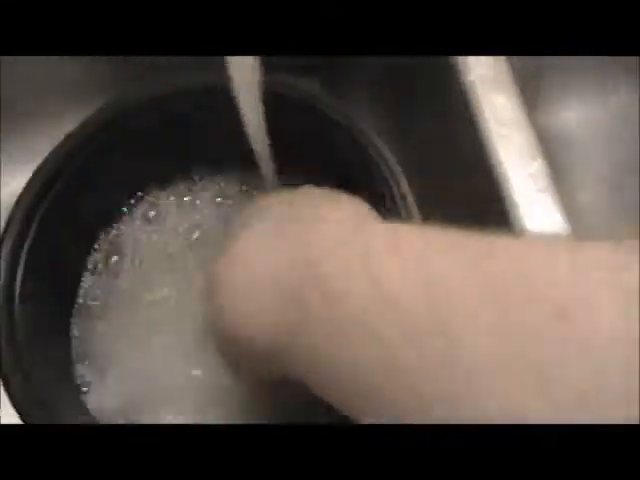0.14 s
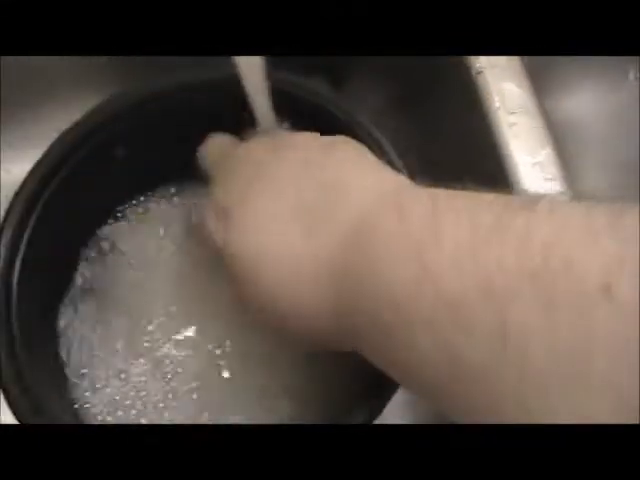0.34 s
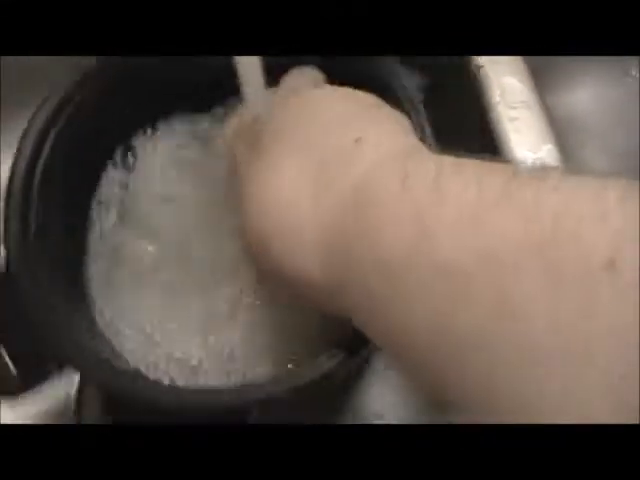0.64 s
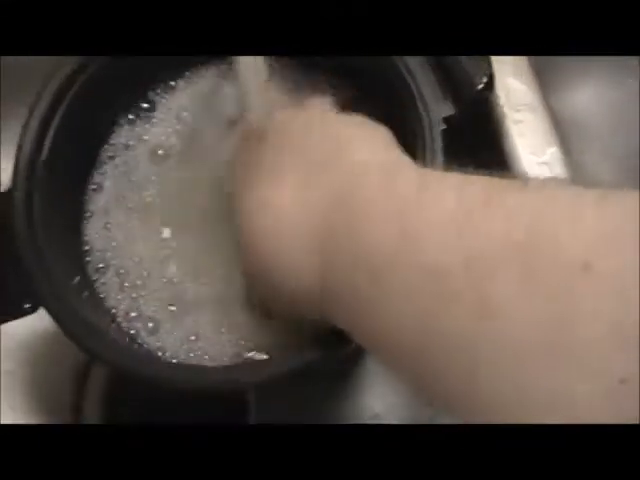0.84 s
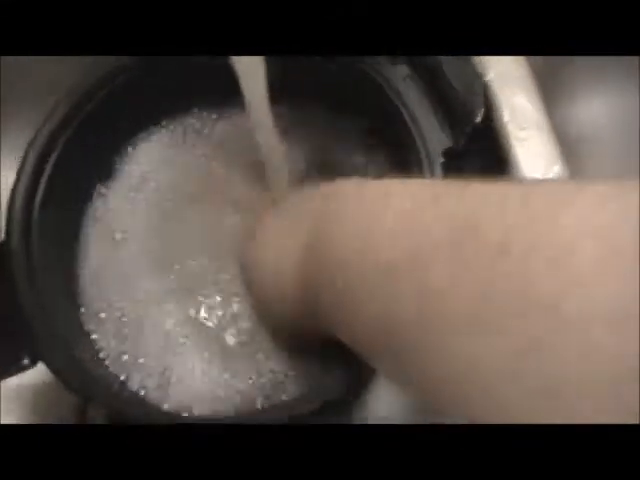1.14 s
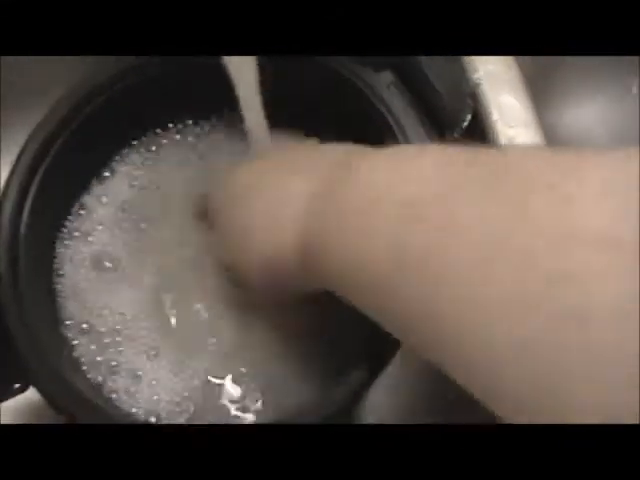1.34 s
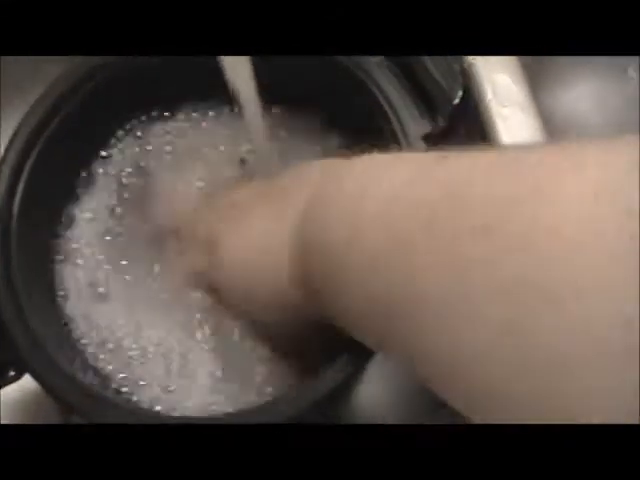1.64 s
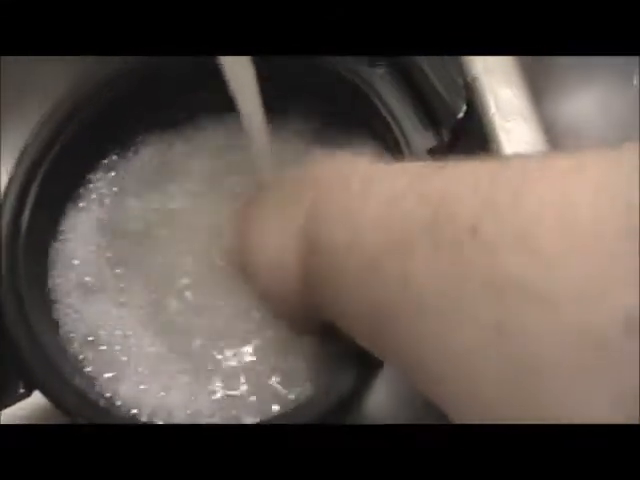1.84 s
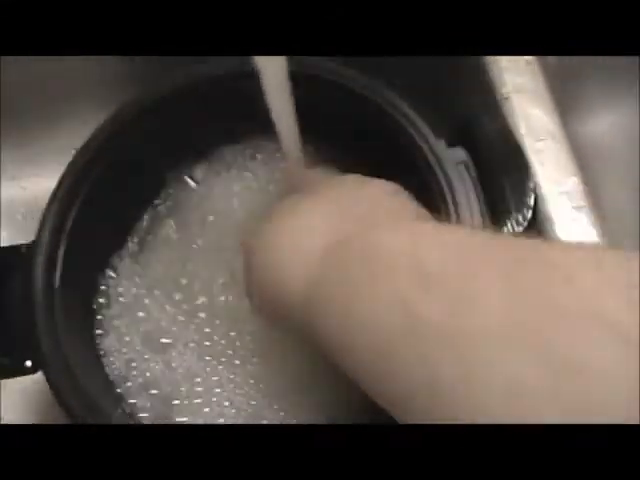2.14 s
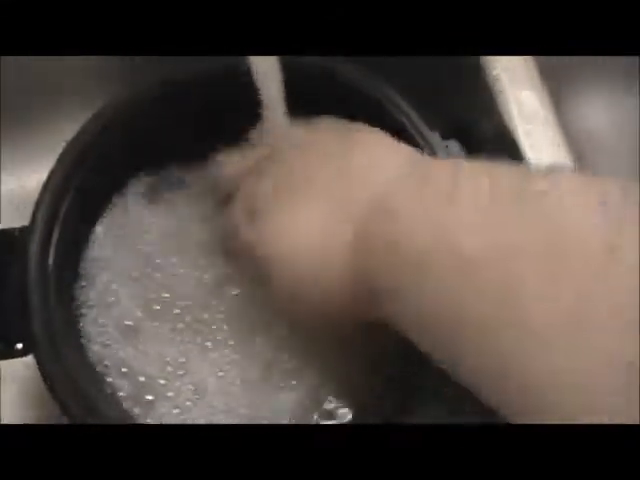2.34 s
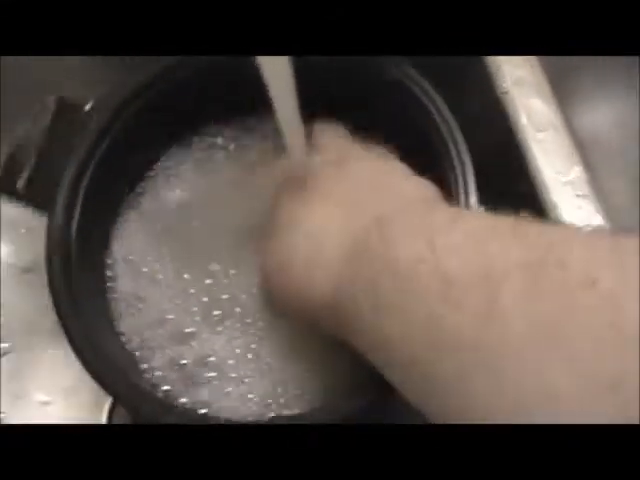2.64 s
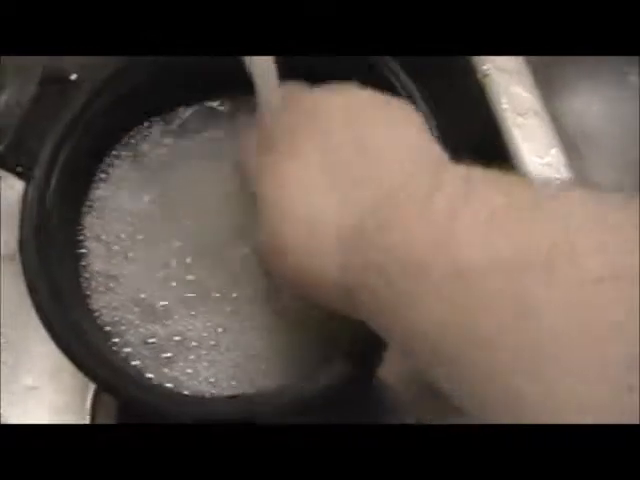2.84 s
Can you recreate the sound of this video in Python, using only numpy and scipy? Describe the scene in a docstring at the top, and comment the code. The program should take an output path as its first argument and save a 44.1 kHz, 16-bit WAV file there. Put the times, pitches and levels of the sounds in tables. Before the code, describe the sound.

Steady faucet stream hissing into a pot in a sink, with watery slops, bubbles and soft thumps

```python
"""A kitchen tap runs steadily into a pot of rice in a steel sink, heard from close above.
The jet is droplets and mist: it fizzes on the back of a hand, falls mostly into open water for about
a second, and meets the hand again. The stirring hand churns and slops the water, made of random impacts
and noise bursts that ring the pot's modes, with bubbles and sung notes among them.
The sink floor booms in soft thumps, the basin drones, and a few wet clinks ring out."""
import sys
import numpy as np
from scipy import signal
from scipy.fft import rfft, irfft
from scipy.io import wavfile
from scipy.ndimage import map_coordinates

SR = 44100
rng = np.random.default_rng(int(sys.argv[2]) if len(sys.argv) > 2 else 0)


def waveform_to_disk(signal):
    """Save audio, clipped to [-1, 1], as 16-bit WAV at the path in sys.argv[1]."""
    frames = np.transpose(np.atleast_2d(signal))
    scaled = np.clip(frames, -1, 1) * 32767
    samples = np.round(scaled).astype(np.int16)
    wavfile.write(sys.argv[1], SR, samples)


N = 132300
TIME, FREQ = np.arange(N) / SR, np.fft.rfftfreq(N, 1 / SR)


def amp(db):
    """Decibels to gain."""
    return 10 ** (np.asarray(db) / 20)


def unit(x):
    """Scales to rms 1."""
    return x / np.sqrt(np.mean(x ** 2) + 1e-20)


def over_time(points):
    """A control curve at every sample."""
    return np.interp(TIME, *np.transpose(points))


def over_freq(points):
    """A spectrum at every frequency, joined on a log axis."""
    freq_hz, value = np.transpose(points)
    return np.interp(np.log(FREQ + 1), np.log(freq_hz + 1), value)


def colour(x, points):
    """Filters by a spectrum in dB."""
    return irfft(rfft(x) * amp(over_freq(points)), N)


def add(mix, start_s, sound):
    """Mixes a sound in at a time."""
    part = mix[max(round(start_s * SR), 0):][:len(sound)]
    part += sound[:len(part)]


def impacts(per_s, spread_db):
    """Random clicks of either sign, many small and a few large."""
    size = amp(spread_db * np.minimum(rng.exponential(1, N), 5.5))
    sign = rng.choice([-1, 1], N)
    return size * sign * (rng.random(N) < per_s / SR)


def wander(per_s):
    """Smooth random drift of rms 1."""
    smoothing = np.exp(-(FREQ / per_s) ** 2)
    return unit(irfft(rfft(rng.standard_normal(N)) * smoothing, N))


def ring(x, modes):
    """The direct sound plus the ringing of some modes, each a damped complex resonator."""
    out = x.copy()
    for hz, peak_db, t60_s in modes:
        decay = np.exp(-np.log(1000) / (t60_s * SR))
        pole = decay * np.exp(2j * np.pi * hz / SR)
        out += 2 * amp(peak_db) * signal.lfilter([1 - decay], [1, -pole], x).real
    return out


# droplet pings per second, their spread in dB, and cycles each rings before falling to 1/e
DROPS_PER_S, DROP_SPREAD_DB, DROP_CYCLES = 6000, 3.5, 4.3
SPLAT_GAIN = .55  # sharp splats against the ringing droplets


def droplets(count=28):
    """Tiny bubbles of many sizes, each ringing for a few cycles, among sharp splats."""
    t, out = np.arange(256) / SR, np.zeros(N)
    for hz in np.linspace(1800, 16000, count):
        ping = np.sin(2 * np.pi * hz * t) * np.exp(-t * hz / DROP_CYCLES)
        hits = impacts(DROPS_PER_S / count, DROP_SPREAD_DB)
        out += np.convolve(hits, unit(ping))[:N]
    splats = impacts(per_s=5000, spread_db=2.6)
    return unit(out) + SPLAT_GAIN * unit(splats)


# echoes from the pot wall and the arm: [shortest_s, longest_s]
ECHO_DELAY_S = (.001, .012)
ECHO_GAIN, ECHO_DRIFT_S = .15, .00006  # gain of each, rms drift of its delay


def near_walls(x, count=8):
    """Echoes from the pot wall and the arm, whose delays drift as the hand moves."""
    out = x.copy()
    for delay_s in rng.uniform(*ECHO_DELAY_S, count):
        read_s = TIME - delay_s - ECHO_DRIFT_S * wander(per_s=1.29)
        out += ECHO_GAIN * rng.choice([-1, 1]) * map_coordinates(x, [read_s * SR], order=3)
    return out


# spray colour on the hand and in open water: [freq_hz, level_db per Hz]
ON_HAND = [(1120, -39), (1900, -3.5), (2000, -11), (2110, -11.5), (2250, -9), (2430, -7.5), (2800, -4),
           (3320, -17.5), (3430, -2), (3920, 1), (4210, 0), (4850, 2.5), (5730, -4), (6960, 1.5),
           (8380, -2), (10000, 1), (10500, -4), (12300, -3.5), (14100, -9.5), (15200, -9), (15700, -5.5)]
IN_WATER = [(1120, -30), (1900, -14), (2090, -12), (2330, -10), (2630, -7), (2800, -7), (3090, -14),
            (3170, -9), (3690, -6), (4360, -3.5), (4720, -3), (5390, 1), (6380, -1), (7280, -5.5),
            (8240, -1.5), (9000, 2.5), (10100, -8.5), (11300, -3), (12400, -9), (13800, -8.5), (15700, -18)]
# narrow resonances between hand, water and pot wall: [freq_hz, peak_db over the direct sound, t60_s]
HAND_RING = [(3350, -18, .03), (4100, -15, 0.01), (4460, -14, 0.011), (5030, -28, 0.065), (5950, 8, 0.025),
             (6920, -1, 0.036), (7640, 0, 0.047), (10100, -3.5, 0.031)]
WATER_RING = [(3505, -9, .03), (4430, -8, .03), (5540, -7, .02), (6250, -7, .015), (7920, -8, .02),
              (8400, -4, .012), (9100, -4, .015), (11050, -8, .015)]
# where the jet lands: [time_s, open_water_share 0-1]
LANDING = [(0, 0.17), (.85, .05), (1.12, 0.8), (1.42, 0.6), (1.52, 0.44), (1.65, 0.7), (1.95, 0.56),
           (2.2, 0.26), (3, 0.1)]
# strength of the spray: [time_s, level_db]
SPRAY = [(0.3, -18.5), (0.69, -19), (1.31, -17.5), (1.6, -18.5), (1.64, -17), (2.88, -18.5), (2.95, -19)]
MIST_DB = 6.5  # over the ringing droplets


def jet(flutter_db=0.55, flutter_per_s=50):
    """Droplets and fine mist; their colour follows what the jet lands on."""
    mist = amp(MIST_DB) * rng.standard_normal(N)
    spray = near_walls(droplets() + mist)
    spray = spray * amp(flutter_db * wander(flutter_per_s))
    wet = np.clip(over_time(LANDING), 0, 1)
    hand = unit(ring(colour(spray, ON_HAND), HAND_RING))
    water = unit(ring(colour(spray, IN_WATER), WATER_RING))
    return unit((1 - wet) * hand + wet * water) * amp(over_time(SPRAY))


SWAY_PER_S, SWAY_S = 3, .0009  # rate of the sway, rms depth as a wandering delay


def swayed(x):
    """The pitch wavers as the water sloshes from side to side."""
    read_s = TIME + SWAY_S * wander(SWAY_PER_S)
    return map_coordinates(x, [read_s * SR], order=3, mode="mirror")


# ringing of the pot and the sink around it: [freq_hz, peak_db over the direct sound, t60_s]
POT = [(343, 6.5, 0.038), (447, 3.5, 0.067), (586, 5, 0.22), (731.5, 13, 0.047), (860, 5.5, 0.029),
       (1021, -1, 0.023), (1438, 11, 0.038), (1501, 12, 0.047), (1760, 14, 0.11), (2887, 4.5, .03)]
# colour of the churning, and of the jet drumming in the pot: [freq_hz, level_db per Hz]
CHURN_COLOUR = [(60, -42), (190, -1.5), (320, -2), (550, 3.5), (900, 2.5), (1300, 5.5), (2000, -18),
                (3500, -6)]
DRUM_COLOUR = [(60, -37), (200, -10), (300, -8.5), (500, 0), (800, -4), (1200, -4.5), (1600, 6.5),
               (2300, -3.5), (3200, 17), (5000, -10)]
# churning of the water: [time_s, level_db before the CHURN_DB trim]
CHURN = [(0.0, -28.5), (0.13, -33), (0.26, -36), (0.51, -33), (0.8, -35.5), (1.07, -33), (1.17, -32.5),
         (1.51, -31.5), (1.75, -28.5), (2.13, -29.5), (2.56, -39.5), (2.77, -36.5), (3.0, -35.5)]
CHURN_DB, CHURN_PER_S, CHURN_SPREAD_DB = -1, 900, 1.5
DRUM_DB = -31.5


def churn():
    """The jet drums evenly in the pot while the hand stirs water and rice, now harder, now softer."""
    drum_hits = impacts(per_s=2000, spread_db=2.5)
    drum = unit(ring(colour(drum_hits, DRUM_COLOUR), POT))
    stir_hits = impacts(CHURN_PER_S, CHURN_SPREAD_DB)
    stir = unit(ring(colour(stir_hits, CHURN_COLOUR), POT))
    stir_gain = amp(CHURN_DB + over_time(CHURN))
    return amp(DRUM_DB) * swayed(drum) + stir_gain * swayed(stir)


BUBBLE_DB, BUBBLES_PER_S, BUBBLE_SPREAD_DB = -42, 130, 2.4
BUBBLE_T60_S, BUBBLE_GLIDE_PER_S = .07, 1.2  # ring time, fraction the pitch rises per second


def bubbles(count=30):
    """Small bubbles stirred up by the hand ring briefly, each rising a little in pitch."""
    t, out = np.arange(SR // 10) / SR, np.zeros(N)
    for hz in np.linspace(560, 2400, count):
        cycles = hz * t * (1 + BUBBLE_GLIDE_PER_S * t / 2)
        ping = np.sin(2 * np.pi * cycles) * amp(-60 * t / BUBBLE_T60_S)
        hits = impacts(BUBBLES_PER_S / count, BUBBLE_SPREAD_DB)
        out += signal.oaconvolve(hits, ping)[:N]
    return amp(BUBBLE_DB) * unit(ring(out, POT))


# low drone of the basin under the jet: [freq_hz, level_db per Hz]
BASIN = [(20, -48), (45, -31), (70, -13), (98, -2.5), (120, 0.5), (145, -3.5), (175, -26), (210, -15),
         (250, 0), (290, -28), (600, -54)]
BASIN_DB = -50.5


def basin():
    """Steady noise shaped into the basin's low drone."""
    return amp(BASIN_DB) * unit(colour(rng.standard_normal(N), BASIN))


# the water-loaded pot sings briefly: [start_s, length_s, peak_db, pitch_hz]
NOTES = [(0, .17, -29.5, 720), (.258, .048, -25, 646), (1.06, .05, -30, 760), (1.695, .08, -30, 1503),
         (1.71, .05, -31, 581), (1.67, .09, -32, 315), (2.365, .06, -35.5, 590), (2.49, .13, -36, 574),
         (2.93, .08, -34, 730)]
NOTE_RISE_S, NOTE_FADE_DB, NOTE_WAVER = .006, 9, .35  # attack, fade reached at length_s, waver gain


def note(length_s, peak_db, hz):
    """One mode of the pot rings out, wavering as the water moves."""
    rise = np.minimum(TIME / NOTE_RISE_S, 1)
    fade = amp(-NOTE_FADE_DB * np.minimum(TIME / length_s, 4) ** 2)
    phase = 2 * np.pi * hz * TIME
    tone = np.sin(phase) + NOTE_WAVER * wander(per_s=30) * np.cos(phase)
    return amp(peak_db) * rise * fade * tone


# slops of water against the pot: [start_s, length_s, level_db, centre_hz, width_octaves]
SLOPS = [(.005, 0.014, -29, 696, 0.61), (.113, 0.061, -28, 725, 1.06), (0.195, 0.041, -32.5, 735, 0.98),
         (0.225, 0.028, -22.5, 1440, 0.49), (.252, 0.0084, -21, 1450, 0.24),
         (0.258, .022, -20.5, 1254, .33), (.254, 0.021, -34, 470, 0.37), (0.467, 0.012, -25.5, 800, 1.23),
         (0.525, 0.023, -27.5, 560, 2.1), (0.716, 0.088, -36, 2100, 0.068), (0.773, 0.032, -29.5, 450, 3.3),
         (1.043, 0.053, -33.5, 804, 0.25), (1.173, 0.064, -32.5, 810, 0.17), (1.212, .025, -29.5, 460, 1.2),
         (1.341, 0.028, -27.5, 1130, 0.27), (1.565, 0.0087, -26, 654, 1.7), (1.613, .008, -21.5, 795, .5),
         (1.628, 0.016, -25.5, 660, 0.81), (1.653, .012, -19, 1140, 0.36), (1.666, .018, -20.5, 480, .65),
         (1.7, 0.013, -23, 686, 0.52), (1.765, 0.0096, -20.5, 810, 0.28), (1.825, .011, -21, 350, .45),
         (1.833, 0.015, -21.5, 900, 0.29), (1.96, 0.009, -25.5, 794, 0.55), (2.087, 0.009, -25, 810, 0.78),
         (2.11, 0.04, -29.5, 1890, 0.19), (2.285, 0.017, -30, 760, 0.16), (2.466, 0.0056, -26, 1430, 0.69),
         (2.52, 0.046, -34.5, 690, 0.76), (2.746, 0.022, -31.5, 1680, 0.36), (2.765, 0.075, -34, 820, 0.43)]
SLOP_RISE_S, SLOP_FADE_DB = .0012, 10  # attack, fade reached at length_s


def slop(length_s, level_db, centre_hz, width_octaves, size=8192):
    """A pocket of air collapses in a short burst of pops that ring the pot."""
    t, f = np.arange(size) / SR, np.fft.rfftfreq(size, 1 / SR)
    pops = rng.standard_normal(size) ** 3  # cubing makes the peaks spiky
    band_gain = np.exp(-.5 * (np.log2((f + 1) / centre_hz) / width_octaves) ** 2)
    band = irfft(rfft(pops) * band_gain, size)
    burst = band * np.minimum(t / SLOP_RISE_S, 1) * amp(-SLOP_FADE_DB * (t / length_s) ** 2)
    # the energy is that of level_db held for length_s
    return amp(level_db) * unit(ring(burst, POT)) * np.sqrt(length_s * SR / size)


# the pot nudges the sink: [start_s, level_db, pitch_hz]
THUMPS = [(0.022, -39, 109), (0.256, -44, 112), (0.526, -37, 105), (.776, -34, 106), (.893, -31, 100),
          (1.061, -45, 89), (1.212, -32.5, 121), (1.447, -30, 112.6), (1.608, -33, 122), (1.669, -31, 114),
          (1.708, -34, 111), (1.831, -37, 97), (1.877, -37, 116), (1.957, -42, 110), (2.02, -37, 105),
          (2.884, -41, 128)]
THUMP_RISE_S, THUMP_T60_S, THUMP_PUSH = .014, .13, .25  # attack, decay, gain of the push


def thump(level_db, hz):
    """A soft push and a short boom of the sink floor."""
    t = np.arange(SR // 3) / SR
    rise = np.sin(np.pi / 2 * np.minimum(t / THUMP_RISE_S, 1)) ** 2
    decay = amp(-60 * np.maximum(t - THUMP_RISE_S, 0) / THUMP_T60_S)
    boom = rise * decay * np.sin(2 * np.pi * hz * t)
    u = t / THUMP_RISE_S * 2
    push = u * (2 - u) * np.exp(-u)  # swings one way, then back
    return amp(level_db) * (boom + THUMP_PUSH * push)


# wet clinks: [start_s, level_db]
CLINKS = [(.2285, 0), (2.0143, -6), (2.758, -10)]
# partials of a clink: [pitch_hz, level_db before decay, t60_s]
CLINK = [(3720, -11.5, .04), (4100, -6, 0.016), (4400, -16, 0.032), (6500, -10, .02)]


def clink(rise_s=0.00098):
    """A bright, quickly damped ring of a few partials."""
    t = np.arange(SR // 10) / SR
    partials = sum(amp(db - 60 * t / t60_s) * np.sin(2 * np.pi * hz * t) for hz, db, t60_s in CLINK)
    return np.minimum(t / rise_s, 1) * partials


# level of the side signal against the middle, by frequency: [freq_hz, side_to_mid_db]
SIDE_LEVEL = [(100, -11), (320, -14), (750, -13), (1500, -9.5), (2400, -15), (3500, -14.5), (5700, -21),
              (7300, -23), (9300, -15), (11800, -7), (15000, -6)]
# level of the left channel against the right, by frequency: [freq_hz, left_over_right_db]
LEAN = [(100, -2), (300, 0), (700, 1.2), (1300, 1.2), (2800, 2.6), (5500, .5), (9000, .3), (15000, 2.2)]
KITCHEN_T60_S = .3  # decay of the reflections in the sink and kitchen


def stereo(x):
    """Reflections from the sink and kitchen reach left and right with opposite sign."""
    walls = rng.standard_normal(N) * amp(-60 * TIME / KITCHEN_T60_S)
    reflected = signal.fftconvolve(x, walls / np.linalg.norm(walls))[:N]
    side = colour(reflected, SIDE_LEVEL)
    lean = amp(over_freq(LEAN) / 2)  # half the difference to each channel
    return irfft(rfft(np.array([x + side, x - side])) * np.array([lean, 1 / lean]), N)


def scene():
    """Jet, churning, bubbles, basin, notes, slops, thumps and clinks, all from one spot."""
    mix = jet() + churn() + bubbles() + basin()
    for start_s, *row in NOTES:
        add(mix, start_s, note(*row))
    for start_s, *row in SLOPS:
        add(mix, start_s, slop(*row))
    for start_s, *row in THUMPS:
        add(mix, start_s, thump(*row))
    for start_s, level_db in CLINKS:
        add(mix, start_s, amp(level_db) * clink())
    return stereo(mix)


LOW_CUT_HZ, EDGE_HZ = 48, 15780


def record(dry):
    """The recorder's low cut and band limit."""
    low_cut = signal.butter(3, LOW_CUT_HZ, "high", fs=SR, output="sos")
    thin = signal.sosfilt(low_cut, dry)
    band_limit = signal.firwin(701, EDGE_HZ, window=("kaiser", 9), fs=SR)
    return signal.oaconvolve(thin, band_limit[None], "same")


dry = scene()
out = record(dry)
waveform_to_disk(out)
```